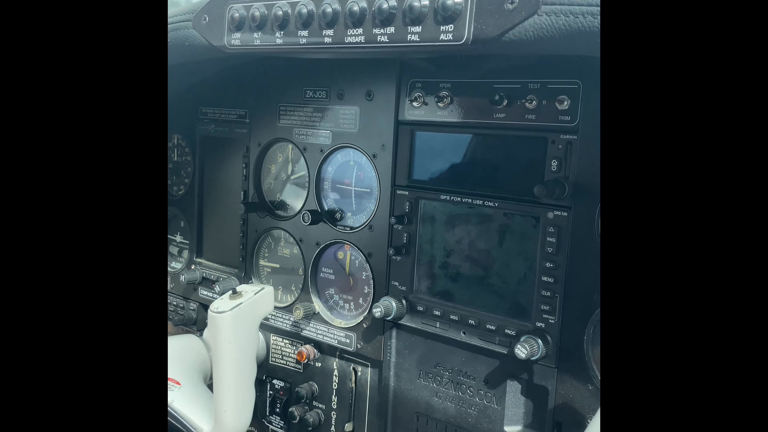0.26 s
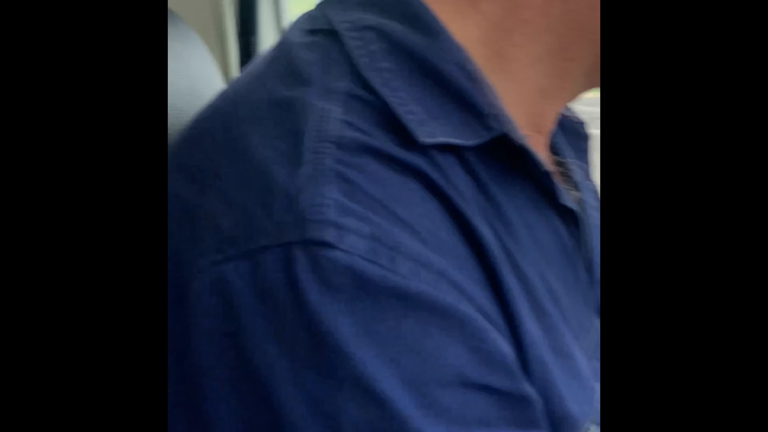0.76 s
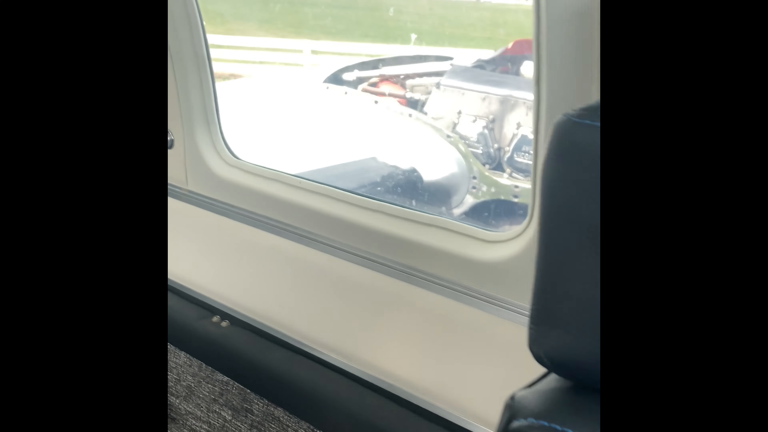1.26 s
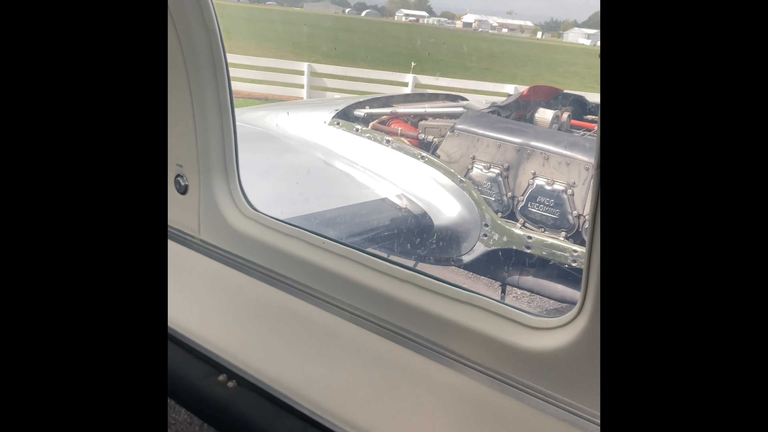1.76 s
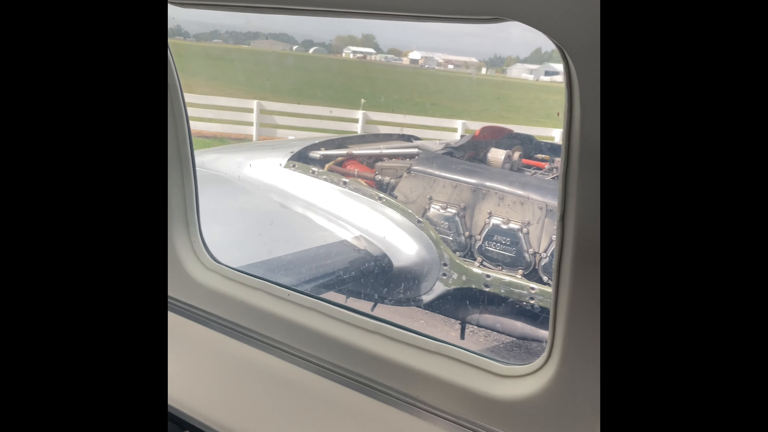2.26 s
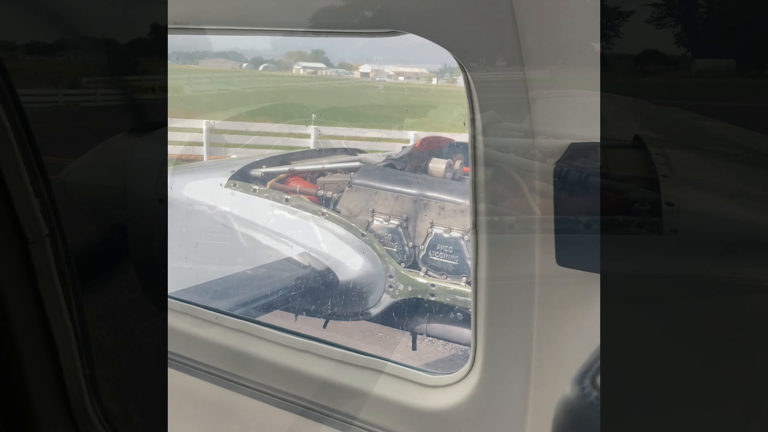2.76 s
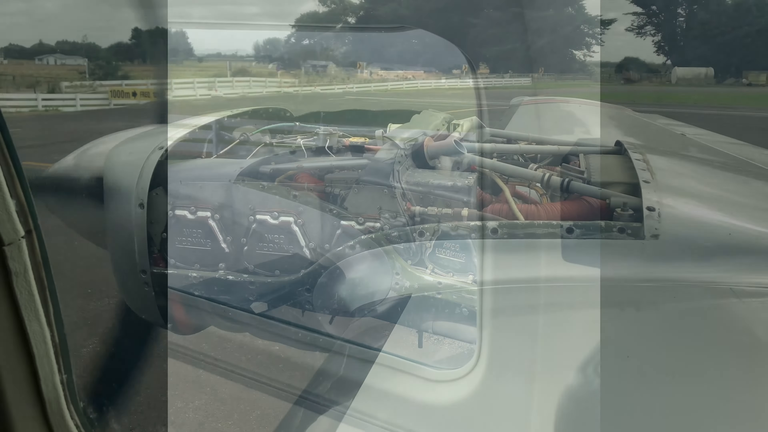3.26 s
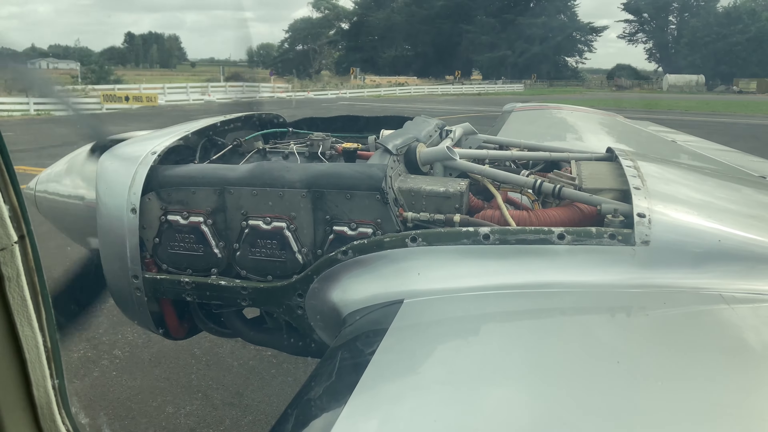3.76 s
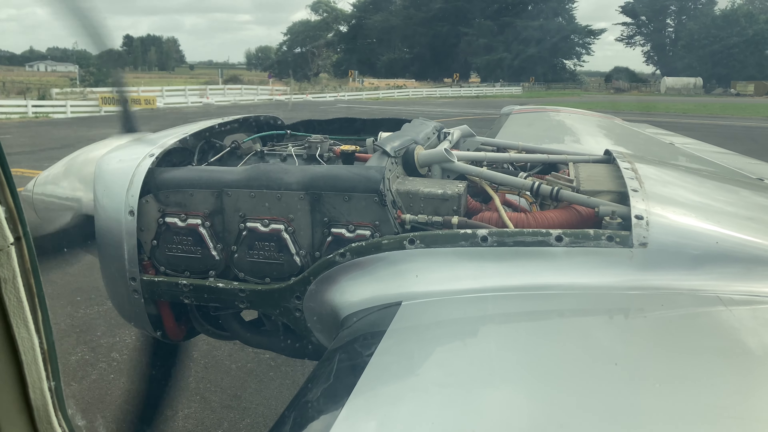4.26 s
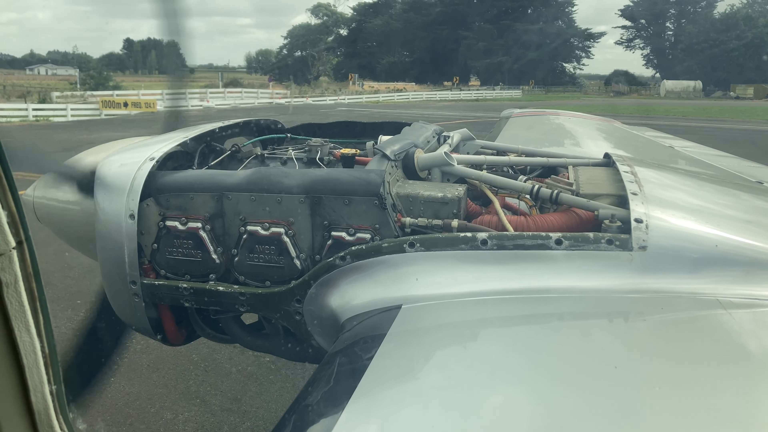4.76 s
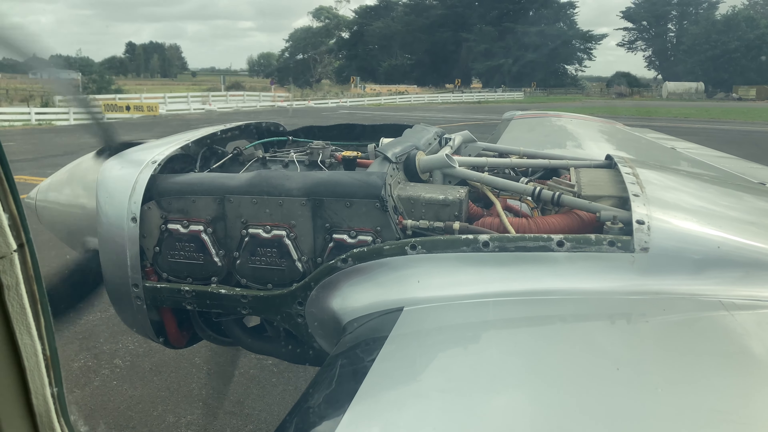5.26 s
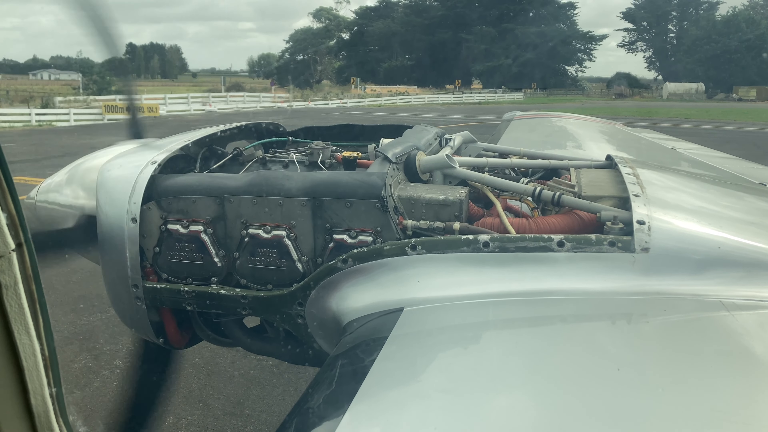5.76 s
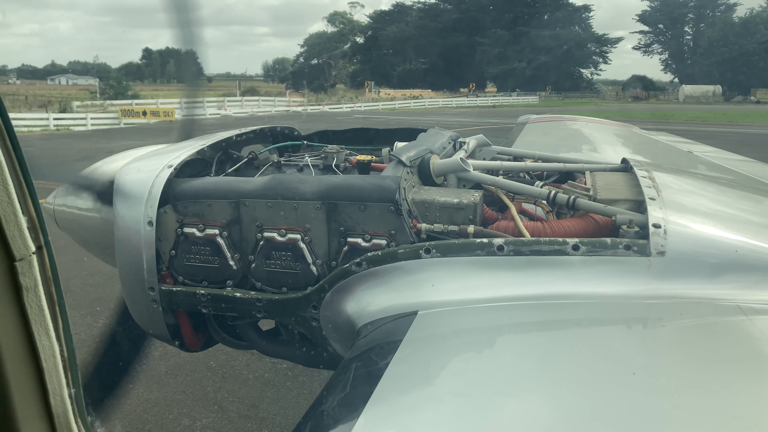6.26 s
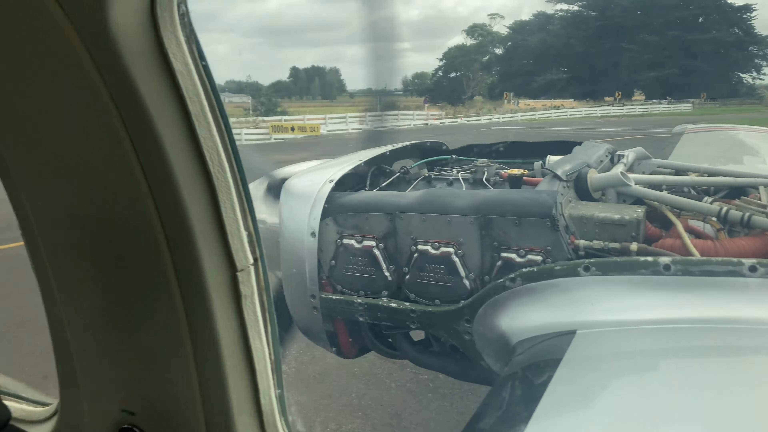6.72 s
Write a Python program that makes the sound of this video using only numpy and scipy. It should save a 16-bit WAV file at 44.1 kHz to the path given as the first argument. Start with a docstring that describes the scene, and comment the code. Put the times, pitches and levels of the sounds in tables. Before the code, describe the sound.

Low twin-propeller drone fills a small cabin, with handling bumps and a sharp click, crossfading into a throbbing drone with two short faint hums.

```python
"""Two eight-cylinder piston engines with three-blade propellers drone either side of a small cabin.
Crank-locked sines beat as the speeds, nearly matched at first, drift apart over banded noise roar and side tones.
Damped sines bump the recorder, a switch snaps by ringing modes and noise; resonances lift bands, the roar surges.
Trim ticks as noise bursts; a cross-fade leads to a seat by the other window, where the speeds differ more and
the drone throbs. The switch snaps again, then a low sine hum cuts in twice, each time ending in a dull knock."""
import sys
import numpy as np
from scipy import signal
from scipy.io import wavfile
from scipy.ndimage import uniform_filter1d

SR = 44100
rng = np.random.default_rng(int(sys.argv[2]) if len(sys.argv) > 2 else 0)


def dump(signal):
    """Clip the signal to [-1, 1] and save it as 16-bit WAV at the path in sys.argv[1]."""
    limited = np.clip(np.atleast_2d(signal).T, -1, 1)
    pcm = np.round(limited * 32767).astype(np.int16)
    wavfile.write(sys.argv[1], SR, pcm)


N = 308259
STEP = 8   # samples between computed points of the engine tones
SIDES = np.array([[1], [-1]])   # left, right


def from_db(db):
    """Logarithmic level: decibels to amplitude gain."""
    return 10 ** (np.asarray(db) / 20)


def rms_one(x):
    """Normalisation: scale to unit rms."""
    return x / np.sqrt(np.mean(x ** 2) + 1e-20)


def in_time(rows, step=1):
    """Linear interpolation: columns of a time table at every step-th sample."""
    s, *columns = np.transpose(rows)
    return [np.interp(np.arange(0, N, step) / SR, s, c) for c in columns]


def at_hz(points, hz):
    """Interpolation on a logarithmic frequency axis: columns of a spectrum table at given frequencies."""
    f, *columns = np.transpose(points)
    return [np.interp(np.log(hz), np.log(f), c) for c in columns]


def drift(rate_hz, step=1):
    """Low-passed noise: a slow random wander of rms 1, drawn every 64 samples."""
    r = np.exp(-2 * np.pi * rate_hz * 64 / SR)
    settled = 1500     # discard the filter's start
    noise = rng.standard_normal(N // 64 + settled + 2)
    slow = signal.lfilter([1], [1, -2 * r, r * r], noise)[settled:]
    return np.interp(np.arange(0, N, step) / 64, np.arange(len(slow)), rms_one(slow))


def resonate(x, peaks):
    """Modal superposition: parallel two-pole resonances of alternating sign."""
    out = 0
    for k, (hz, width, db) in enumerate(peaks):
        r = np.exp(-np.pi * width / SR)
        poles = [1, -2 * r * np.cos(2 * np.pi * hz / SR), r * r]
        zeros = np.array([1, 0, -1]) * (1 - r * r) / 2
        out = out + (-1) ** k * from_db(db) * signal.lfilter(zeros, poles, x)
    return out


def burst(s, t60):
    """Exponential decay: an envelope that starts at s with a 1.8 ms rise and falls 60 dB in t60 seconds."""
    out, at = np.zeros(N), round(s * SR)
    age = np.arange(min(N - at, SR // 2)) / SR
    out[at:at + len(age)] = from_db(-60 * age / t60) * np.clip(age / .0018, 0, 1)
    return out


# engine speeds: time_s [s], first_speed [rpm], second_speed [rpm]
FRONT_SPEEDS = [(0, 1299.8, 1298.9), (0.9, 1294.4, 1298.5), (1.8, 1294.8, 1283.8), (2.9, 1301.0, 1277.1)]
WINDOW_SPEEDS = [(3.5, 1293.3, 1337.5), (4.6, 1295.0, 1338.6), (5.8, 1292.1, 1338.0), (7, 1291.2, 1334.5)]
# engine tones before swing and wander: multiple [of the four-stroke cycle rate], first_db [dB], second_db [dB],
# second_ahead [turns], first_left_over_right [dB], second_left_over_right [dB]
FRONT_ENGINE_TONES = [(6, -10, -12.5, 0.53, 2.5, 2.5), (7, -47, -49, 0.87, 3.5, 1.5),
                      (8, -32.5, -34.5, 0.1, 3, 4), (9, -31.5, -22.5, 0.01, 2, 3.5),
                      (10, -35.5, -37, 0.78, 2.5, 12), (11, -48.5, -48.5, 0.24, 2, 2.5),
                      (12, -19, -13.5, 1, 1, 2), (15, -41.5, -51.5, 0.43, -1, 3.5),
                      (16, -52, -41, 0.18, 8, 2), (17, -43, -50.5, 0.98, -2.5, 2),
                      (18, -33, -22.5, 0.72, 1, 2.2), (19, -42.5, -33.5, 0.27, 5, 2.5),
                      (20, -26.5, -21.5, 0.54, 2, 2), (21, -30, -44, 0.76, 2.5, 5),
                      (22, -32, -32.5, 0.5, 1, -1), (23, -40, -37.5, 0.079, 1.5, -2),
                      (24, -24.5, -33, 0.4, 2, 4)]
# the same columns, then first_left_lead [rad], second_left_lead [rad]
WINDOW_ENGINE_TONES = [(4, -37.5, -41, 0.82, 1, 1.5, 3, -1.5), (6, -16, -12.5, 0.99, -6.5, 2, 0.04, 0.9),
                       (7, -48, -40.5, 0.99, -4, 8.5, 1, 2), (8, -37.5, -34, 0.052, -1, 3, 1, -1),
                       (9, -37, -26, 0.75, -2, 7.5, -1.5, 0.5), (10, -55.5, -37.5, 0.35, 4, 10.5, 6, 2.5),
                       (12, -23.5, -17.5, 0.14, 7.5, 3, 0, 0.17), (15, -32, -36, 0.73, 0.5, 1.5, 1.5, 0),
                       (17, -38, -41.5, 0.52, 10, -4, 4.5, -1), (18, -28, -48.5, 0.83, 4, -1.5, -0.2, 2),
                       (19, -33, -61.5, 0.34, 0.5, 15.5, 0, -0.5),
                       (20, -22, -37.5, 0.43, 1.5, 8, 0.41, 0.5), (21, -32.5, -37, 0.63, -2, 6.5, 0.5, 0.5),
                       (22, -38, -33, 0.11, -6.5, 0.5, 2, 0.5), (23, -35, -39.5, 0.92, 6, -4.5, 0, 0),
                       (24, -48.5, -40, 0.94, -8, -11.5, 3.5, 1)]
# mean levels of the upper blade overtones: pitch_hz [Hz], first_db [dB], second_db [dB]
FRONT_OVERTONES = [(318, -42, -45), (477, -43, -40.5), (660, -43, -45.5), (980, -47.5, -55),
                   (1250, -56.5, -53.5), (1710, -61, -59), (2280, -71.5, -74)]
WINDOW_OVERTONES = [(309, -40, -32.5), (379, -33.5, -48.5), (515.4, -39.5, -47), (583, -61, -45.5),
                    (740, -50.5, -53.5), (822, -59, -58.5), (872, -50.5, -47.5), (952, -50, -50),
                    (985, -62.5, -63), (1240, -58.5, -59), (1580, -65.5, -67.5), (1960, -73, -72.5),
                    (2400, -78, -74)]
# the microphone swings through standing waves: time_s [s], blade_tone_db [dB], octave_db [dB], other_tones_db [dB]
MICROPHONE_SWING = [(0, 3.5, 1.5, -7), (0.401, 4, 3, 0), (0.799, -2.5, 1, -2), (1.2, -3, 0, -3.5),
                    (1.6, 0.5, -1, -0.5), (2.0, 1.5, -3, -1.5), (2.4, -4.5, -4.5, -1), (2.9, -0.5, 0, -1.5)]
# no level change: time_s [s], then three levels [dB]
STEADY = [(0, 0, 0, 0), (7, 0, 0, 0)]
# single overtones stand out or sink: multiple [of the cycle rate], start_s [s], end_s [s], boost_db [dB]
OVERTONE_SWELLS = [(60, 0, .6, 6), (42, .55, 1.65, 6), (54, .6, 1.2, 8), (48, .65, 1.65, 7),
                   (72, 1.15, 2.96, 8), (60, 1.9, 2.8, 5), (30, 3.55, 4.05, -9), (30, 5.5, 6, -9),
                   (60, 1.25, 1.65, 9), (30, .45, 1.4, 7), (48, 3.55, 3.82, 8), (48, 4.12, 4.88, 7),
                   (36, 4.1, 4.5, 3), (36, 4.4, 4.85, 9), (36, 5, 5.9, 3), (36, 6.2, 6.8, 4),
                   (48, 6.4, 6.75, 5)]
SECOND_SWELL = 0.65   # second engine's share of a swell's decibels


def crank_tones(cycles, tones, swing, start_turns, waver_db):
    """Beating: sines locked to each crank interfere as the two engines' speeds differ."""
    blade_db, octave_db, other_db = in_time(swing, step=STEP)
    out = 0
    for order, db_1, db_2, ahead, pan_1, pan_2, *lead in tones:
        # scattered start phases: turns per multiple and per multiple squared
        start = order * start_turns[0] + order ** 2 * start_turns[1]
        place_db = {6: blade_db, 12: octave_db}.get(order, other_db)
        engines = zip(cycles, (db_1, db_2), (0, ahead), (pan_1, pan_2), lead or (0, 0))
        for cycle, db, turns, pan, rad in engines:
            angle = 2 * np.pi * (order * cycle + start + turns) + rad / 2 * SIDES
            level = db + place_db + pan / 2 * SIDES + waver_db * drift(1.8, step=STEP)
            out = out + from_db(level) * np.cos(angle)
    return out


def blade_overtones(cycles, first_rpm, blades, loose_db, loose_turns):
    """Unsteady blade loading: blades meet uneven air, so overtones wander in level and phase."""
    out, t = 0, np.arange(0, N, STEP) / SR
    for order in range(30, 228, 6):
        swell = sum(db * np.clip(np.minimum(t - a, b - t) / 0.11, 0, 1)
                    for k, a, b, db in OVERTONE_SWELLS if abs(k - order) < 3)
        levels = at_hz(blades, order * first_rpm / 120)
        for cycle, db, boost in zip(cycles, levels, (swell, SECOND_SWELL * swell)):
            wander = loose_turns * np.sqrt(order / 48) * drift(4.27, step=STEP)
            turns = 0.55 * rng.random() + wander + rng.normal(0, 0.07, (2, 1))
            flutter = loose_db * (order / 60) ** 0.33 * drift(6.7, step=STEP)
            level = db + boost + flutter + 1.6 * SIDES
            out = out + from_db(level) * np.cos(2 * np.pi * (order * cycle + turns))
    return out


def engines(rpm, tones, blades, swing, start_turns, waver_db, loose_db, loose_turns):
    """Harmonic synthesis: integrated speed gives the cycle count that drives every tone of each engine."""
    # a four-stroke cycle takes two turns, hence 120
    cycles = [np.cumsum(v) / 120 * STEP / SR for v in in_time(rpm, step=STEP)]
    drone = crank_tones(cycles, tones, swing, start_turns, waver_db)
    drone = drone + blade_overtones(cycles, rpm[0][1], blades, loose_db, loose_turns)
    full = signal.resample_poly(drone, STEP, 1, axis=1, padtype="antireflect")
    return full[:, :N], np.repeat(cycles, STEP, axis=1)[:, :N]


def firings(cycles, rise_db, uneven_db):
    """Periodic modulation: eight firings a cycle, each a rising ramp in dB with its own random strength."""
    count = 8 * cycles
    strength = rng.standard_normal((2, 1000))
    own = np.take_along_axis(strength, count.astype(int), axis=1)
    ramp = rise_db * (count % 1 - .5)
    smooth = uniform_filter1d(uneven_db * own + ramp, size=40, axis=1)
    return smooth.sum(axis=0)


# airframe roar before normalisation: pitch_hz [Hz], density_db [relative dB per Hz],
# left_right_likeness [correlation, clipped to -1..1]
FRONT_ROAR_SPECTRUM = [(25.2, -20, 0.99), (70.5, -2.5, 0.99), (137, -12, 0.98), (230, -9, 0.89),
                       (350, -18, 1), (775, -23, 0.17), (1230, -30.5, .45), (1960, -37, 0.24),
                       (2870, -44, 0), (5830, -52, 0.0024), (8100, -51, 0.57), (10500, -67, 0.031),
                       (15500, -75.5, 0.17)]
WINDOW_ROAR_SPECTRUM = [(25, -13.5, 3.8), (64, -17, 2.5), (215, -11.5, 1.1), (302, -17, 0.5),
                        (550, -25, -0.46), (627, -23.5, -0.9), (760, -26.5, -0.75), (980, -29, -0.61),
                        (1190, -36, -0.42), (1690, -40.5, -0.4), (3270, -53, 0.1), (6700, -60, 0.16),
                        (15100, -85.5, -12.5)]
# front seat's change in the roar bands above 5 kHz: time_s [s], level_db [dB]
FRONT_TREBLE = [(0, 1.5), (.4, 1), (1.2, -4.5), (2, -4.5), (7, -1)]


def roar(spectrum, cycles, treble, firing_db, patchy_db, chop_db, throb_db):
    """Modulated noise: third-octave bands chopped by firings and blade passes and pumped by the beat."""
    out, together, edges = 0, drift(5), 22 * 2 ** np.arange(0, 9.6, 1 / 3)
    white, treble_db = rng.standard_normal((2, 2, N)), in_time(treble)[0]
    blades = 2 * np.pi * 6 * cycles     # three blades, two turns a cycle
    beat = np.cos(blades[1] - blades[0])
    chop = firing_db + chop_db * np.cos(blades).sum(axis=0) + throb_db * beat
    for k, (low, high) in enumerate(zip(edges, edges[1:])):
        band = signal.butter(2, [low, high], "band", fs=SR, output="sos")
        mid, side = signal.sosfilt(band, white[k % 2])
        db, alike = at_hz(spectrum, np.sqrt(low * high))
        alike = np.clip(alike, -1, 1)
        calm = np.clip(1500 / low, .35, 1)     # the treble stays more even
        patches = patchy_db * (.25 * together + drift(11))
        modulation = calm * (patches + chop * (low > 300))
        gain = from_db(db + treble_db * (low > 5000) + modulation)
        out = out + gain * (np.sqrt(1 + alike) * mid + np.sqrt(1 - alike) * side * SIDES)
    # left-right mean has rms 1 between 600 and 2000 Hz
    band = signal.butter(2, [600, 2000], "band", fs=SR, output="sos")
    middle = signal.sosfilt(band, out.mean(axis=0))
    return out / np.sqrt(np.mean(middle ** 2))


# steady tones: pitch_hz [Hz], front_seat_db [dB], window_seat_db [dB], left_over_right [dB]
STEADY_TONES = [(69.25, -53, -36, 4), (84.7, -36, -43.5, 3.5), (113, -50, -34, 3), (92, -50, -39, 3)]


def side_tones(front, window):
    """Superposition: steady sines whose levels cross-fade between the seats."""
    t, out = np.arange(N) / SR, 0
    for hz, front_db, window_db, pan_db in STEADY_TONES:
        level = front * from_db(front_db) + window * from_db(window_db)
        sine = np.sin(2 * np.pi * (hz * t + rng.random()))
        out = out + level * from_db(pan_db / 2 * SIDES) * sine
    return out


# dull bumps on the hand-held recorder: start_s [s], pitch_hz [Hz], level_db [dB before decay and pan]
RECORDER_BUMPS = [(.244, 620, -23), (.712, 640, -23), (.719, 1300, -31), (0.735, 1330, -22),
                  (.782, 850, -15), (.829, 880, -29), (2.499, 1000, -31), (6.064, 520, -31)]
BUMP_CYCLES = 18   # to die away by 60 dB


def bumps():
    """Damped oscillation: short thuds, a little to the left."""
    t = np.arange(N) / SR
    out = sum(from_db(db) * burst(s, BUMP_CYCLES / hz) * np.sin(2 * np.pi * hz * (t - s))
              for s, hz, db in RECORDER_BUMPS)
    return from_db(1.2 * SIDES) * out


# switch snaps and bounces: start_s [s], level_db [dB], top_db [dB], bottom_db [dB], right_port_delay [samples]
SWITCH_SNAPS = [(.293, -45.5, 8, -10, 5), (.3544, -9, 1, -3, 5), (.358, -15, 0, 0, 5),
                (.3655, -26, -4, 2, 5), (3.4546, -24, -6, -8, 1), (3.4585, -30, -12, -8, 1),
                (3.4675, -34, -9, -8, 1)]
# modes of the switch body, low and middle, and its bright crack: pitch_hz [Hz], width_hz [Hz], level_db [relative dB]
LOW_MODES = [(690, 90, -1), (1390, 100, -1), (2000, 120, -4), (2500, 120, -3), (3230, 100, 2),
             (3840, 100, 3)]
BODY_MODES = [(4530, 100, 3), (4850, 110, 1), (5200, 130, 0), (5900, 150, -2), (6600, 200, 0)]
CRACK_BANDS = [(6800, 1500, -11), (8900, 1800, -5), (10500, 580, -15), (14500, 3100, -24)]
CRACK_T60_S, CABIN_T60_S, CABIN_DB = 0.022, 0.075, -17
MODE_DB = -3   # the body's modes against the crack


def ringing(modes, age):
    """Free vibration: each mode's bandwidth sets its decay time."""
    out = 0
    for hz, width, level in modes:
        decay = burst(0, np.log(1000) / np.pi / width)[:len(age)]
        sine = np.sin(2 * np.pi * (hz * age + rng.random()))
        out = out + from_db(MODE_DB + level) * decay * sine
    return out


def snaps():
    """Impact excitation: a contact rings the body and sprays a crack, with interaural-like port delay and cabin tail."""
    apart = np.array([[[.2]], [[.6]]])     # independent left-right noise in direct sound, tail
    both = rng.standard_normal((2, 1, N)) + apart * rng.standard_normal((2, 2, N))
    bottom, middle, top = (rms_one(resonate(both, p)) for p in (LOW_MODES, BODY_MODES, CRACK_BANDS))
    age, out = np.arange(SR // 10) / SR, 0
    for s, db, top_db, bottom_db, lag in SWITCH_SNAPS:
        low_ring, ring = ringing(LOW_MODES, age), ringing(BODY_MODES, age)
        room = middle[1] + from_db(top_db) * top[1] + from_db(bottom_db) * bottom[1]
        crack = burst(s, CRACK_T60_S) * from_db(top_db) * top[0]
        sound = crack + from_db(CABIN_DB) * burst(s, CABIN_T60_S) * room
        at = round(s * SR)
        sound[:, at:at + len(age)] += ring + from_db(bottom_db) * low_ring
        out = out + from_db(db) * np.array([sound[0], np.roll(sound[1], lag)])
    return out


# cabin resonances that come and go as the microphone moves:
# start_s [s], end_s [s], pitch_hz [Hz], width_hz [Hz], added_db [dB]
CABIN_RESONANCES = [(0.553, 0.922, 1270, 198, -2.5), (0.676, 0.885, 870, 177, -12),
                    (1.453, 2.0, 1650, 130, -12), (2.05, 2.3, 1480, 120, -4),
                    (2.334, 2.806, 990, 250, -3.5), (2.5, 2.9, 1660, 131, -8), (3.4, 4.143, 920, 126, -11),
                    (5.55, 5.84, 1290, 301, -3.5), (6.056, 6.4, 920, 200, -2.5),
                    (6.497, 6.75, 990, 260, -2), (6.522, 6.72, 2460, 200, 6)]
RING_EDGE_S = 0.086


def ring_out(x):
    """Room resonance: each adds a filtered band of the drone while the microphone is in it."""
    t, out = np.arange(N) / SR, x.copy()
    for start, end, hz, width, db in CABIN_RESONANCES:
        near = slice(int(start * SR), int(end * SR))
        gate = np.clip(np.minimum(t[near] - start, end - t[near]) / RING_EDGE_S, 0, 1)
        out[:, near] += gate * resonate(x[:, near], [(hz, width, db)])
    return out


# brief swells of the roar: centre_s [s], boost_db [dB]
ROAR_SURGES = [(.76, 1), (1.3, 1.5), (2.62, 1), (5.72, 1), (6.62, 0.5)]
SURGE_S = 0.058   # from the centre to 1/e of the boost


def surges():
    """Gaussian modulation: the roar's level in dB swells briefly."""
    t = np.arange(N) / SR
    return sum(db * np.exp(-((t - s) / SURGE_S) ** 2) for s, db in ROAR_SURGES)


# loose trim rattles, about one tick a propeller turn:
# first_tick_s [s], ticks [count], turn_s [s], level_db [dB before shaping and spread]
TRIM_RATTLES = [(2.541, 6, .0469, -49), (3.342, 1, .0453, -46), (3.7145, 4, .0453, -45),
                (4.181, 5, .0455, -42), (4.687, 4, .0453, -45), (5.105, 5, .0456, -44.5),
                (5.479, 5, .0454, -42), (6.0337, 3, .0453, -44), (6.452, 5, .0453, -42.5)]
# tick colour: pitch_hz [Hz], width_hz [Hz], level_db [relative dB]
TICK_BANDS = [(2700, 700, -5), (4300, 1000, 1.5), (7500, 730, -6), (13100, 690, 4.5), (15300, 1200, -5)]
RATTLE_EDGE_DB, RATTLE_UNEVEN_DB = 6, 2   # drop one place beyond the end ticks; tick-to-tick spread


def trim():
    """Repeated impacts: runs of tiny bright noise ticks that swell and fade."""
    hits, uneven = 0, rng.standard_normal((len(TRIM_RATTLES), 8))
    for (s, ticks, turn, db), own in zip(TRIM_RATTLES, uneven):
        for k, place in enumerate(np.linspace(-1, 1, round(ticks) + 2)[1:-1]):
            level = db - RATTLE_EDGE_DB * place ** 2 + RATTLE_UNEVEN_DB * own[k]
            hits = hits + from_db(level) * burst(s + k * turn - .002, 0.044)     # rise starts 2 ms early
    return hits * rms_one(resonate(rng.standard_normal((2, N)), TICK_BANDS))


# hums that cut in and out: start_s [s], end_s [s], pitch_hz [Hz], level_db [dB before pan]
LOW_HUMS = [(3.65, 3.97, 327.5, -20.5), (5.58, 5.915, 329.7, -21)]
KNOCK_HZ, KNOCK_DB, KNOCK_BEFORE_S = 372, -16.5, 0.012   # starts this long before the hum's end
KNOCK_HISS_DB, KNOCK_HISS_T60_S = -56, .06


def hums():
    """Gated oscillation: a sine cuts in and out, ending in a damped knock and a short puff of hiss."""
    t, out = np.arange(N) / SR, 0
    for on, off, hz, db in LOW_HUMS:
        gate = np.clip(np.minimum(t - on, off - t) / 0.02, 0, 1)
        out = out + gate * from_db(db + 0.9 * SIDES) * np.sin(2 * np.pi * hz * t - 0.5 * SIDES)
        knock = off - KNOCK_BEFORE_S
        out = out + from_db(KNOCK_DB) * burst(knock, 0.13) * np.sin(2 * np.pi * KNOCK_HZ * (t - knock))
        puff = resonate(rng.standard_normal((2, N)), [(2500, 1200, 0.), (6000, 2000, -2)])
        out = out + from_db(KNOCK_HISS_DB) * burst(knock - .015, KNOCK_HISS_T60_S) * rms_one(puff)
    return out


FADE_FROM_S, FADE_TO_S = 2.75, 3.585   # straight cross-fade from the front seat to the window seat
FRONT_ROAR_DB, WINDOW_ROAR_DB = -36.5, -40   # 600 to 2000 Hz, before surges and pan


def scene():
    """Superposition: two seats cross-faded, plus the small sounds."""
    window = np.clip((np.arange(N) / SR - FADE_FROM_S) / (FADE_TO_S - FADE_FROM_S), 0, 1)
    front = 1 - window
    surge_db = surges()
    drone_1, cycles_1 = engines(FRONT_SPEEDS, FRONT_ENGINE_TONES, FRONT_OVERTONES, MICROPHONE_SWING,
                                start_turns=(0, .3679), waver_db=.6, loose_db=3, loose_turns=.1)
    drone_2, cycles_2 = engines(WINDOW_SPEEDS, WINDOW_ENGINE_TONES, WINDOW_OVERTONES, STEADY,
                                start_turns=(.109, .3608), waver_db=0.62, loose_db=3.5, loose_turns=0.091)
    firing_1 = firings(cycles_1, rise_db=1.0, uneven_db=1.73)
    firing_2 = firings(cycles_2, rise_db=1.7, uneven_db=0.7)
    roar_1 = roar(FRONT_ROAR_SPECTRUM, cycles_1, FRONT_TREBLE, firing_1,
                  patchy_db=2.5, chop_db=-0.5, throb_db=0.6)
    roar_2 = roar(WINDOW_ROAR_SPECTRUM, cycles_2, STEADY, firing_2,
                  patchy_db=2.0, chop_db=-0.7, throb_db=0.5)
    seat_1 = drone_1 + roar_1 * from_db(FRONT_ROAR_DB + surge_db + 0.23 * SIDES)
    seat_2 = drone_2 + roar_2 * from_db(WINDOW_ROAR_DB + surge_db + 0.72 * SIDES)
    drone = ring_out(front * seat_1 + window * seat_2)
    return drone + side_tones(front, window) + bumps() + snaps() + trim() + hums()


HISS_DB = -54.5   # rms before its high-pass
CUTOFF_HZ = 16300


def record(dry):
    """Band limiting and soft saturation: bright hiss is added, deep bass dropped, peaks rounded, the top cut."""
    bright = signal.butter(2, 8000, "high", fs=SR, output="sos")
    hiss = signal.sosfilt(bright, rng.standard_normal(dry.shape))
    bass_cut = signal.butter(2, 30, "high", fs=SR, output="sos")
    thin = signal.sosfilt(bass_cut, dry + from_db(HISS_DB) * hiss)
    rounded = 1.15 * np.tanh(thin / 1.15)
    return signal.sosfilt(signal.cheby2(20, 70, CUTOFF_HZ, fs=SR, output="sos"), rounded)


dry = scene()
out = record(dry)
dump(out)
```